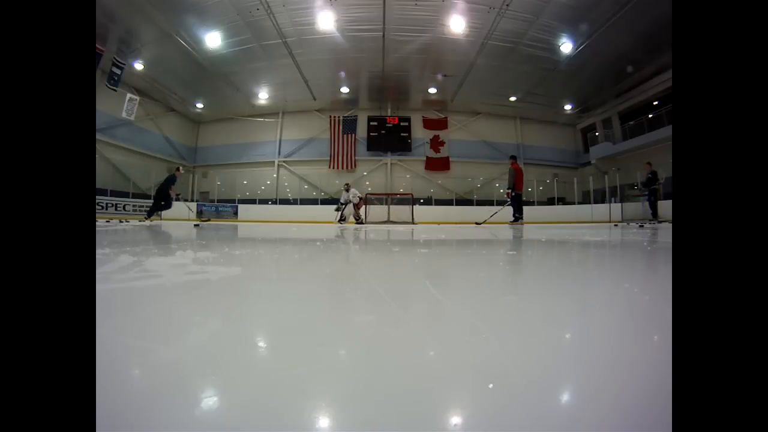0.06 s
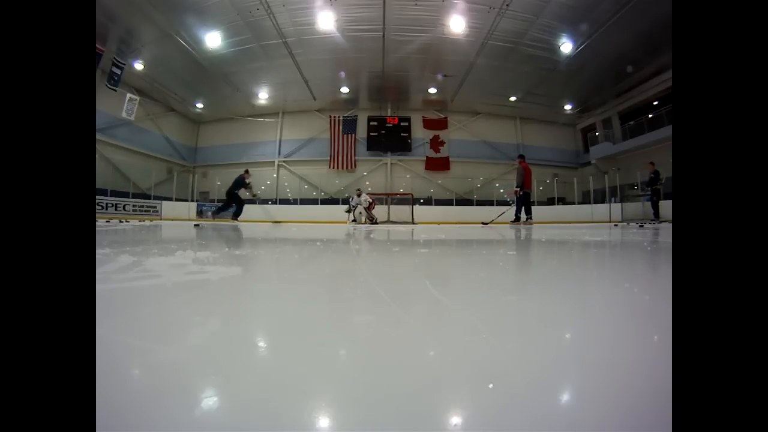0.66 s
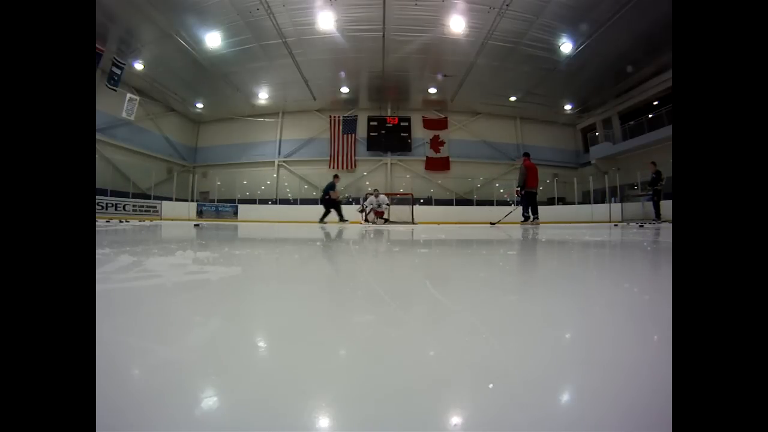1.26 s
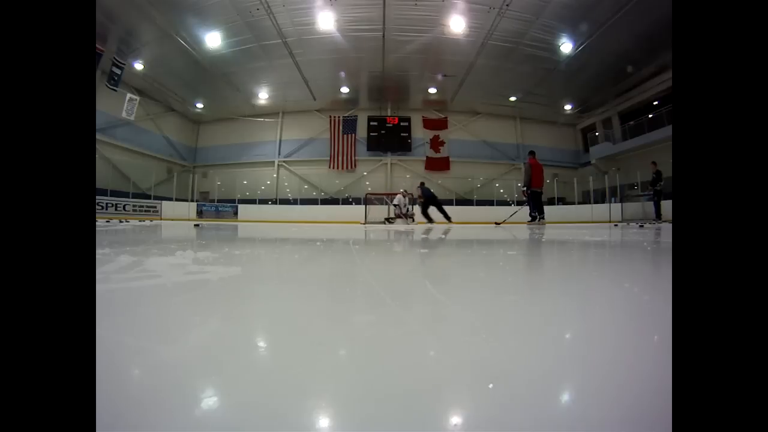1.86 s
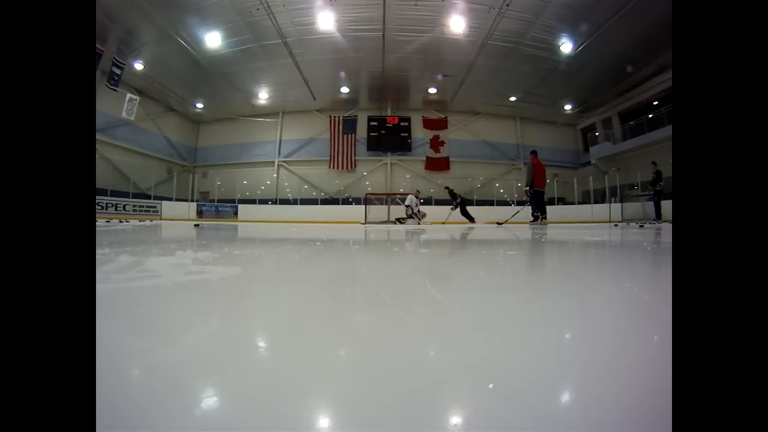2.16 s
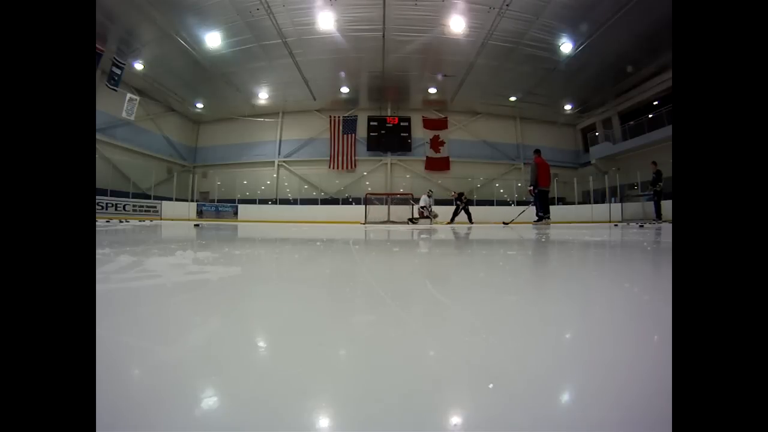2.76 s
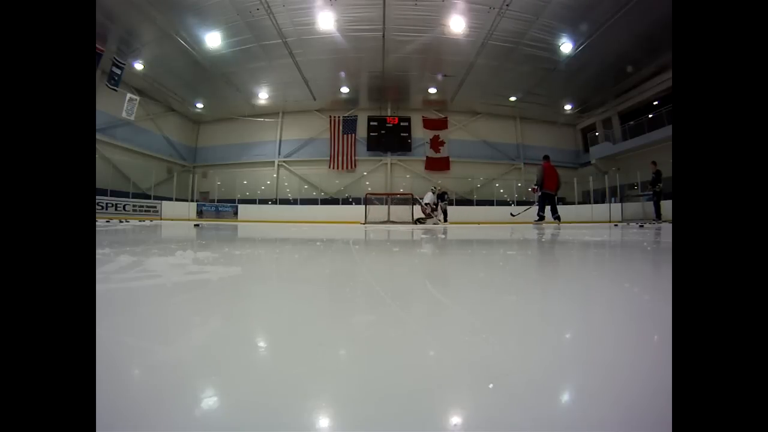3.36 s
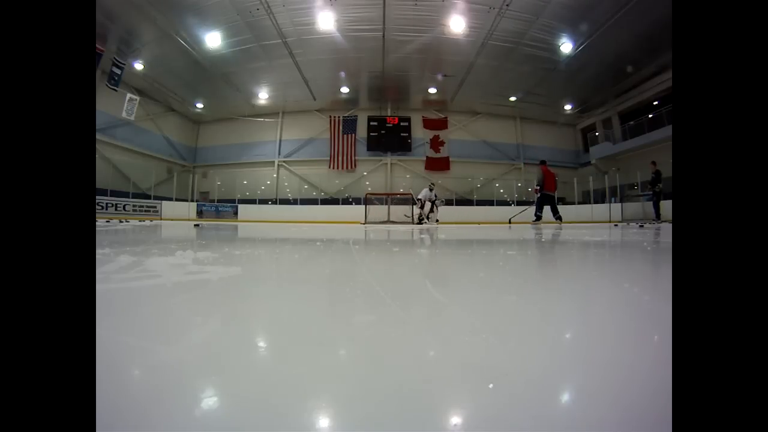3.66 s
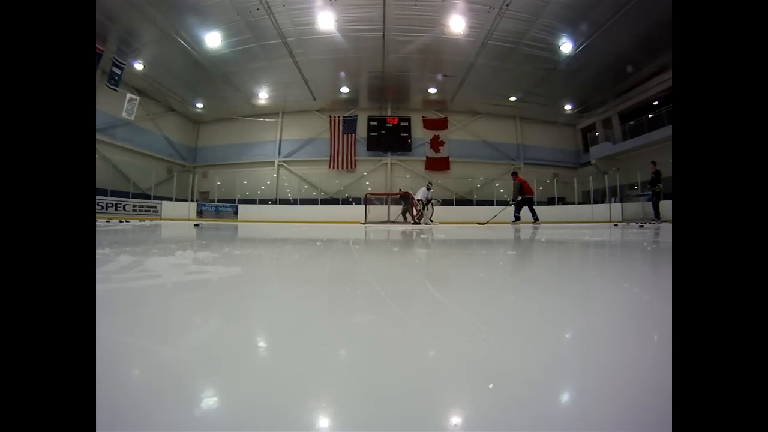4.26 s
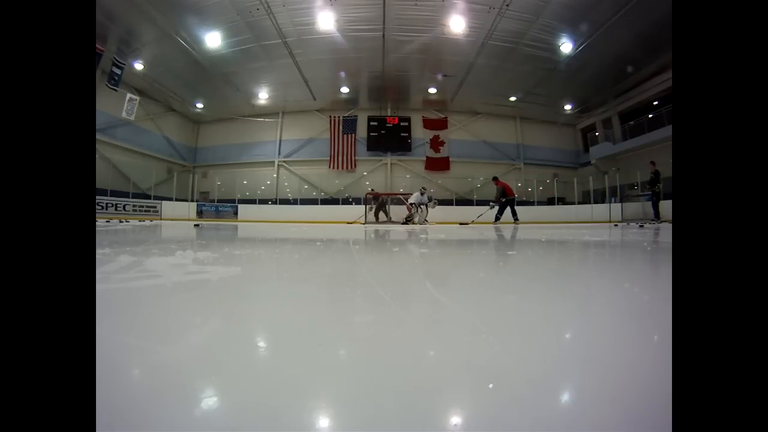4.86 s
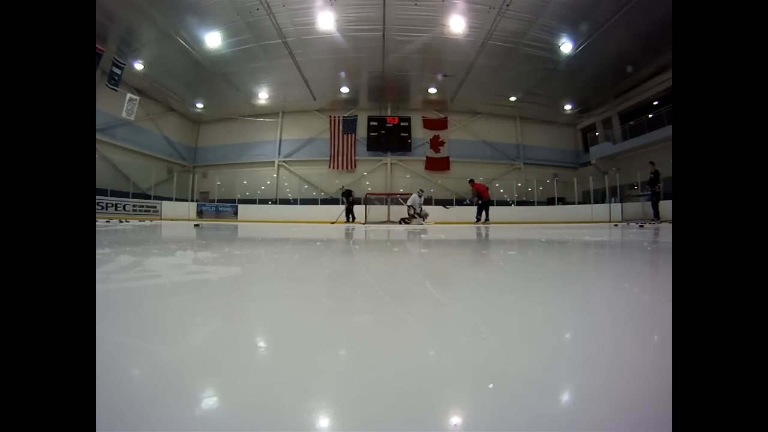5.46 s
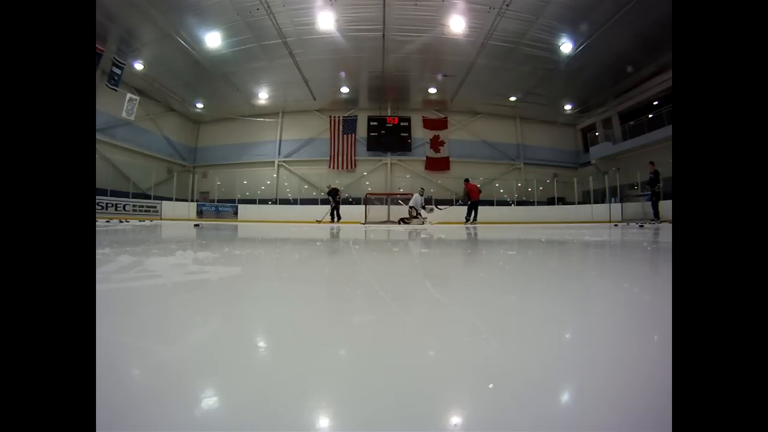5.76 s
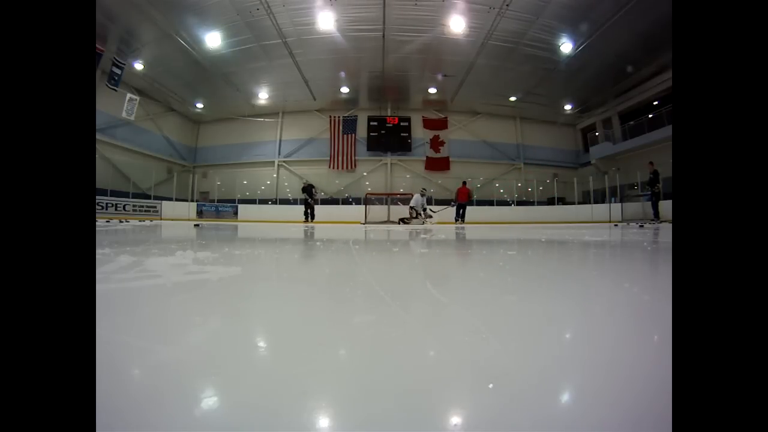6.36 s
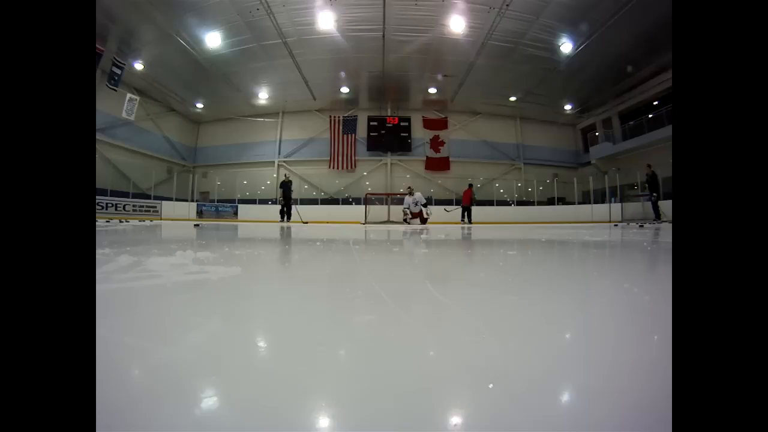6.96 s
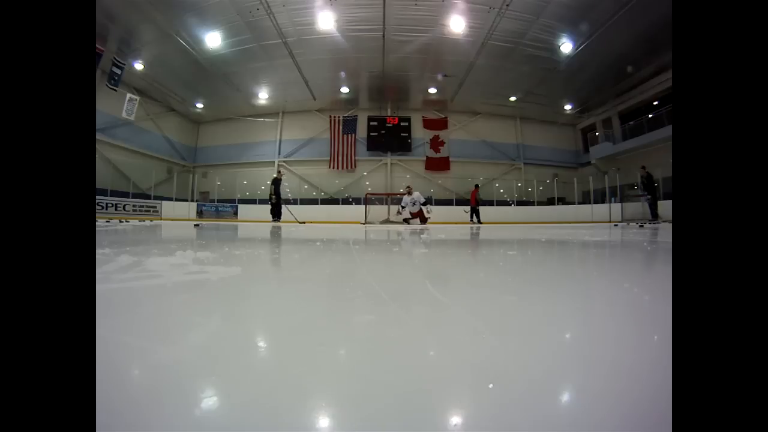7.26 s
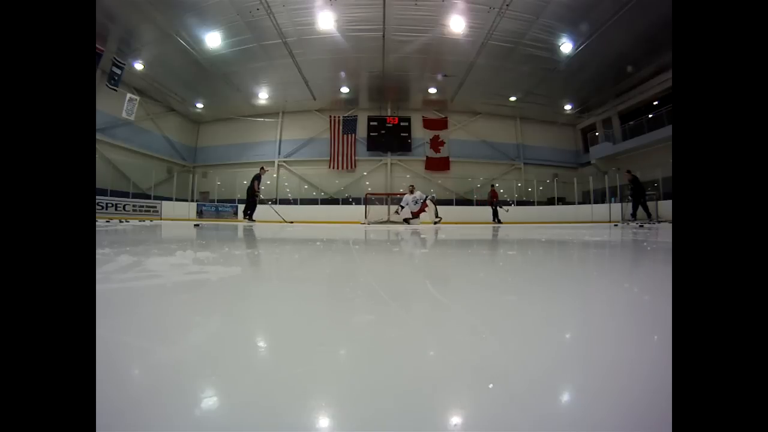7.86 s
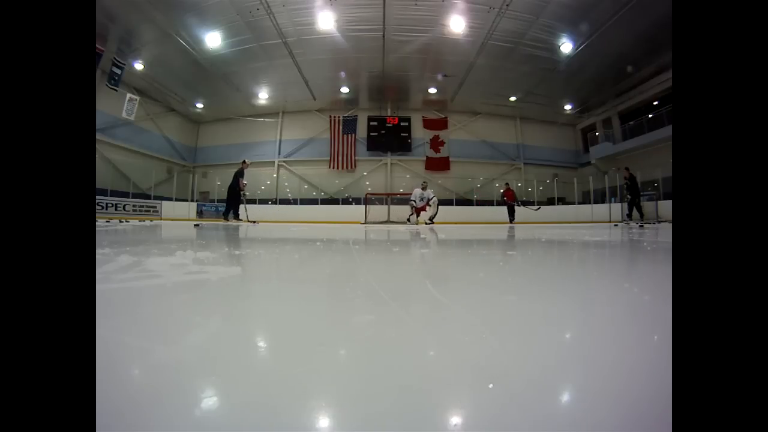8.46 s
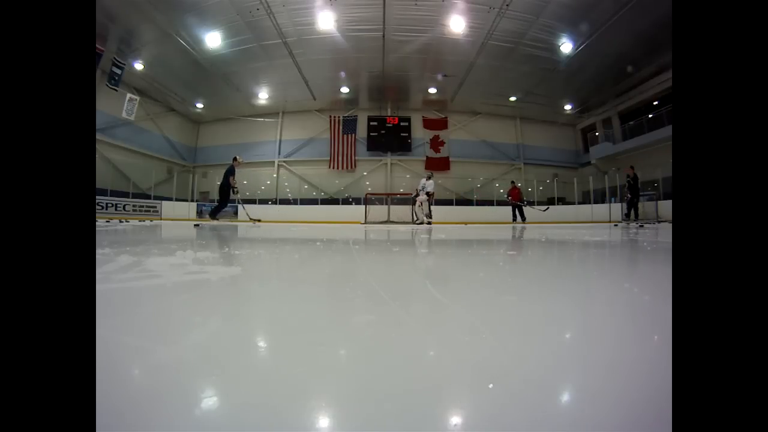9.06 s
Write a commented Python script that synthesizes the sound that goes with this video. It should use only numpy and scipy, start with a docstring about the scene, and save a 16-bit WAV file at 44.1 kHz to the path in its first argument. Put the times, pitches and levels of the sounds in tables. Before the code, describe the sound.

Skates crunch and scrape across ice while hockey sticks tap a puck. A wrist shot cracks early, followed by dull goalie pad thumps and carving blades. After more sharp knocks, a loud slap shot bangs off the far boards and rings through the indoor rink, then skating picks up again. The microphone lies on the ice, sounding boxy and slightly fizzy, with ventilation running steadily behind.

```python
"""Shooting practice, indoor ice rink

The microphone lies on the ice in a small camera case, with the ventilation running behind.
Skates crunch and carve, sticks tap the puck, pads thump through the ice, a wrist shot and a slap shot
crack. The far walls answer and the steel-roofed hall rings for seconds.
The case colours it all and a coarse converter adds a glassy fizz."""
import sys
import numpy as np
from scipy import signal
from scipy.fft import rfft, irfft, next_fast_len
from scipy.io import wavfile

SR = 44100
rng = np.random.default_rng(int(sys.argv[2]) if len(sys.argv) > 2 else 0)


def generate_wav(signal):
    """Clip the signal to [-1, 1] and save it as 16-bit WAV at the path in sys.argv[1]."""
    frames = np.transpose(np.atleast_2d(signal))
    scaled = np.clip(frames, -1, 1) * 32767
    pcm = np.round(scaled).astype(np.int16)
    wavfile.write(sys.argv[1], SR, pcm)


N = 405712
NFFT = 2 * next_fast_len(N // 2 + 1)
TIME = np.arange(N) / SR
FREQ = np.arange(NFFT // 2 + 1) * SR / NFFT + 1

# Levels are relative within each table.
# room tone, the spectrum of the ventilation: f/Hz, level/dB
AIR_SPECTRUM = [(25, -1.5), (60, 1.5), (100, 4), (170, 0.5), (450, -0.5), (800, -0.5), (1200, 1),
                (2300, -26), (5500, -15)]
# hum of fans and lamp ballasts: f/Hz, level/dB
HUM_TONES = [(98, -58), (120, -76)]
# reverberation of the hall: f/Hz, t60/s
HALL_DECAY = [(125, 9.4), (500, 4.5), (1200, 6.5), (2300, 4.71), (3500, 3.5), (5500, 2.6)]
# slaps of a shot off the far walls: delay/s, level/dB
WALL_ECHOES = [(.079, -30), (.25, -14), (0.294, -13), (.437, -13), (.683, -17)]
# modes of the ice sheet under the microphone: f/Hz, width/Hz, level/dB
ICE_MODES = [(123.3, 38, 2), (263, 79, -2.5), (175, 190, -11.5)]
# pads and boots landing, carried by the ice: t/s, level/dB, f/Hz
LANDINGS = [(.23, -49.5, 130), (.98, -44, 136), (1.029, -44, 234), (1.661, -52, 129), (1.879, -45.5, 249.5),
            (2.204, -50, 129), (3.881, -51, 130), (4.092, -53, 255), (4.723, -54, 127), (5.39, -52, 135),
            (6.159, -52, 128), (7.638, -49.5, 139), (8.119, -55, 130), (9.153, -49.5, 247)]
# icy hiss and rumble, from gliding blades and the wash after the slap shot: t/s, level/dB
HISS_LEVEL = [(0, -40.5), (.5, -44), (1.1, -40), (2.0, -32.5), (2.8, -36), (3.3, -42), (4.5, -46.5),
              (6.0, -48.5), (7.0, -41), (8.4, -55), (9.2, -53)]
# skate strokes: t/s, length/s, level/dB, snow spray over scrape/dB
SKATE_STROKES = [(-.05, 0.11, -38.5, -25), (0.245, 0.09, -39, -20), (0.559, .06, -42, -10),
                 (0.743, 0.087, -39.5, 0.5), (0.928, 0.093, -31, -27), (1.235, .19, -32, -11),
                 (1.575, .05, -35, 2), (2.098, 0.36, -35, -2), (2.462, .19, -32.5, -6),
                 (4.08, 0.086, -39, -27), (4.679, .15, -43.5, -2), (5.39, 0.15, -40, -21),
                 (7.627, 0.156, -38.5, 0), (7.906, 0.15, -39, -5), (8.075, 0.4, -42.5, -6.5),
                 (8.458, 0.45, -43.5, -4), (8.864, 0.2, -45, 0.5), (9.04, 0.21, -41, 4),
                 (9.127, .2, -41, -13)]
# a blade edge singing as it carves: t/s, length/s, level/dB, f/Hz
EDGE_CARVES = [(2.226, 0.1, -33.5, 2175), (2.47, 0.17, -33.5, 3310), (4.124, 0.17, -38.5, 2140),
               (7.663, .13, -48, 3520), (8.445, .13, -42, 3550), (8.693, 0.083, -41.5, 2175),
               (8.81, 0.27, -37, 1794), (9.143, 0.14, -35, 1820)]
# modes of a stick's shaft and blade: f/Hz, level/dB, t60/s
STICK_MODES = [(1083, 3, 0.057), (1387, 1.5, 0.08), (1830, -21, 0.012), (2190, -2, 0.01), (2640, 12, 0.028),
               (3140, 20, 0.0058)]
# stick and puck knocks, skate clacks, ice-chip ticks and quick echoes: t/s, level/dB, f/Hz, Q
SHARP_KNOCKS = [(.3115, -22.5, 1890, 1.8), (.334, -24.5, 2280, 1.3), (.513, -30, 2240, 1.6),
                (.572, -35, 5000, 1.2), (.619, -15, 1850, 4.2), (.672, -15, 1910, 5.5),
                (.728, -24.5, 2600, 0.49), (.772, -23, 3320, 1.8), (.8934, -24, 2330, 1.9),
                (1.0, -18, 1750, 0.95), (1.2448, -17, 1650, 0.52), (1.3357, -19, 2150, 1.1),
                (1.57, -18, 5140, 1.25), (1.774, -23, 2490, 2.1), (1.88, -18.5, 3450, 3.5),
                (1.888, -15.5, 1800, 0.38), (1.939, -25, 2300, 3.9), (3.8134, -13, 3080, 2.2),
                (3.825, -22, 3300, 0.75), (3.839, -16.5, 5000, 2.2), (3.863, -24.5, 2400, 0.94),
                (3.882, -21, 3040, 0.82), (4.089, -28, 2600, .5), (4.111, -25, 1200, 1.3),
                (4.729, -29, 2020, .4), (5.558, -33, 1227, 1.4)]
# a stick blade clattering on the ice in four evenly spaced knocks: t/s, gap/s, level/dB, f/Hz
CLATTERS = [(.222, 0.02, -21.5, 1720), (6.051, .0207, -22, 1940), (7.968, .018, -24.5, 2110)]
# the four knocks of a clatter, the third loudest: level/dB
CLATTER_ACCENTS = [-2.5, -6, 0.5, -9.5]
# two shots, blade on ice and puck, puck on far boards: t/s, level/dB, f/Hz, Q, contact/s, hall send/dB
SHOT_BLOWS = [(.970, -21.5, 1220, 0.44, 0.005, 2), (1.020, -18, 2630, 0.69, 0.0036, 1.5),
              (1.027, -21.5, 2260, 0.8, 0.0048, -5), (6.1555, -19.5, 1220, 0.31, 0.0037, 3),
              (6.169, -21, 2700, 0.84, 0.0045, -1.5), (6.178, -12.5, 3160, 0.66, 0.0039, 6.5),
              (6.215, -12.5, 2655, 3.9, 0.00097, 10.5)]
# resonances of the case around the microphone: f/Hz, width/Hz, level/dB
CASE_MODES = [(528, 435, -12.5), (1022, 224, -4.5), (1212.4, 135, 1), (1645, 860, -4.5), (2271, 366, -.5),
              (2650, 443, -7), (3090, 530, -13), (3616, 446, -6.5), (5620, 3500, -18)]


def undb(db):
    """Decibels to gain."""
    return 10 ** (np.asarray(db) / 20)


def unit(x):
    """Scale to an rms of one."""
    return x / np.sqrt(np.mean(x ** 2))


def curve(rows):
    """Gain over time from rows of t/s, level/dB."""
    return undb(np.interp(TIME, *np.transpose(rows)))


def add(track, s, x):
    """Mix x into the track from time s on."""
    i = int(s * SR)
    x, i = x[max(-i, 0):], max(i, 0)
    track[i:i + len(x)] += x[:max(N - i, 0)]


def band(x, hz, q):
    """One resonance, gain 1 at its centre."""
    return signal.lfilter(*signal.iirpeak(hz, max(q, hz / 9000), fs=SR), x)


def steep_band(x, hz, q):
    """The same resonance twice over, scaled to an rms of one."""
    return unit(band(band(x, hz, q), hz, q))


def wander(n, rate_hz):
    """Smooth random drift with a spread near one."""
    steps = np.arange(n) * rate_hz / SR
    return np.interp(steps, np.arange(4096), rng.standard_normal(4096))


def resonances(modes):
    """Gain over frequency of steep overlapping resonances."""
    powers = (undb(db) ** 2 / (1 + (2 * (FREQ - hz) / width) ** 2) ** 2 for hz, width, db in modes)
    return np.sqrt(sum(powers))


def noise(gain):
    """Noise of rms one with the given gain over frequency."""
    return unit(irfft(rfft(rng.standard_normal(NFFT)) * gain, NFFT)[:N])


def ventilation(air_db=-45.5):
    """Room tone: steady air handling, with a wavering hum of fans and lamp ballasts."""
    centres, levels = np.transpose(AIR_SPECTRUM)
    air = noise(undb(np.interp(np.log(FREQ), np.log(centres), levels)))
    hum = sum(undb(db) * np.sin(2 * np.pi * hz * TIME + 0.87 * wander(N, 3)) for hz, db in HUM_TONES)
    return undb(air_db) * air + hum


def hall(x, build_s=0.0044, slap_db=3.5, blend_s=0.12, early_db=2.5, early_s=0.34):
    """Separate slaps off boards, glass and roof blend into a long tail whose treble dies first."""
    t = TIME[:4 * SR]
    echoes = rng.standard_normal(len(t)) * undb(slap_db * np.exp(-t / blend_s) * wander(len(t), 330))
    spectrum = rfft(echoes)
    hz = np.arange(len(spectrum)) * SR / len(t) + 1
    centres, t60s = np.transpose(HALL_DECAY)
    tail = 0
    for share, t60 in zip(np.eye(len(centres)), t60s):
        weight = np.interp(np.log(hz), np.log(centres), share)
        tail += irfft(spectrum * weight, len(t)) * np.exp(-np.log(1000) * t / t60)
    tail *= 1 - np.exp(-t / build_s)
    tail *= undb(early_db * np.exp(-t / early_s))  # the first reflections are the strongest
    return signal.fftconvolve(x, tail / np.sqrt(np.sum(tail ** 2)))[:N]


def far_walls(x):
    """A few distinct, duller repeats from the distant ends of the rink."""
    out = np.zeros(N)
    dull = band(x, hz=2200, q=0.44)
    for delay, db in WALL_ECHOES:
        add(out, delay, undb(db) * dull)
    return out


def board_boom(x):
    """A hard blow also shakes the ice and boards, which feed the hall with low notes."""
    return x + undb(-1) * band(x, hz=500, q=3.3) + undb(3) * band(x, hz=105, q=1.8)


def ice_sheet(rise_s=0.017):
    """A rumble that follows the hiss, and thumps of pads and boots, reach the case through the ice."""
    out = noise(resonances(ICE_MODES)) * undb(-34.5) * curve(HISS_LEVEL) ** 0.63
    t = np.arange(SR // 4) / SR
    for s, db, hz in LANDINGS:
        boom = np.sin(2 * np.pi * hz * t + wander(len(t), 121))
        padding = steep_band(rng.standard_normal(len(t)), hz, q=0.8)
        envelope = t / rise_s * np.exp(1 - t / rise_s)
        add(out, s, undb(db) * envelope * (boom + undb(-5) * padding))
    return out


def ice_chips(per_s, spread_db, chatter_db, chatter_hz):
    """Ice breaking under steel: dense tiny fractures, bunched by the chatter of the blade."""
    size = undb(spread_db * np.minimum(rng.exponential(size=N), 5))
    fractures = (rng.random(N) < per_s / SR) * rng.choice([-1, 1], N) * size
    return unit(fractures * undb(chatter_db * wander(N, chatter_hz)))


def skates(stroke_db=4, hiss_db=3, carve_db=1):
    """Pushes and stops crunch and spray snow, edges sing, and an icy hiss swells and fades beneath."""
    crunch = ice_chips(per_s=5000, spread_db=2.5, chatter_db=1.5, chatter_hz=91.2)
    snow = ice_chips(per_s=9000, spread_db=2, chatter_db=2.5, chatter_hz=70)
    hiss = ice_chips(per_s=6000, spread_db=2, chatter_db=4, chatter_hz=45.81)
    spray = unit(band(band(snow, hz=4500, q=0.43), hz=4100, q=0.57))
    out = unit(band(hiss, hz=1570, q=0.98)) * curve(HISS_LEVEL) * undb(hiss_db)
    for s, length, db, spray_db in SKATE_STROKES:
        span = (int(s * SR) + np.arange(int(length * SR))) % N
        pressure = signal.windows.tukey(len(span), 0.29)
        scrape = unit(band(crunch[span], hz=1850, q=1))
        add(out, s, undb(db + stroke_db) * pressure * (scrape + undb(spray_db) * spray[span]))
    for s, length, db, hz in EDGE_CARVES:
        span = (int(s * SR) + np.arange(int(length * SR))) % N
        pressure = signal.windows.tukey(len(span), 0.98)
        add(out, s, undb(db + carve_db) * pressure * steep_band(crunch[span], hz, q=5.9))
    return out


def knock(hz, q, contact_s, overtone_db, crack_db, ring_db):
    """A brief contact: a dry crack, a hollow knock with its overtone, a short ring of the shaft."""
    t = np.arange(SR // 12) / SR
    # the contact excites all frequencies evenly, each at a slightly different instant
    phase = np.angle(rfft(rng.standard_normal(len(t)) * np.exp(-t / contact_s)))
    push = irfft(np.exp(1j * phase), len(t)) * np.exp(-t / (10 * contact_s))
    ring = 0
    for mode_hz, db, t60 in STICK_MODES:
        detuned_hz = mode_hz * (1 + 0.03 * rng.standard_normal())
        ring += undb(db) * np.sin(2 * np.pi * detuned_hz * t) * np.exp(-np.log(1000) * t / t60)
    hollow = steep_band(push, hz, q) + undb(overtone_db) * steep_band(push, 2 * hz, q)
    crack = unit(band(push, hz=3450, q=0.21))
    hit = hollow + undb(crack_db) * crack + undb(ring_db) * unit(ring)
    return unit(hit) * np.sqrt(contact_s / t[-1])


def blows(rows, gain_db, **timbre):
    """Knocks on two paths: straight to the microphone, and out into the hall."""
    direct, sent = np.zeros(N), np.zeros(N)
    for s, db, hz, q, contact_s, send_db in rows:
        hit = undb(db + gain_db) * knock(hz, q, contact_s, **timbre)
        add(direct, s, hit)
        add(sent, s, hit * undb(send_db))
    return direct, sent


def taps_and_clatters(contact_s=0.0034, send_db=-2.5, clatter_send_db=1.5, clatter_q=1.27, click_q=0.54):
    """Sharp knocks and stick clatters, among faint random clicks that follow the level of the hiss."""
    rows = [(s, db, hz, q, contact_s, send_db) for s, db, hz, q in SHARP_KNOCKS]
    for start, gap, db, hz in CLATTERS:
        for k, accent_db in enumerate(CLATTER_ACCENTS):
            rows.append((start + k * gap, db + accent_db, hz, clatter_q, contact_s, clatter_send_db))
    for when, strength, colour in rng.random((int(5 * N / SR), 3)):  # five clicks a second
        s = when * N / SR
        db = np.interp(s, *np.transpose(HISS_LEVEL)) + 6 + strength
        hz = 2400 * 2 ** (colour - 0.5)
        rows.append((s, db, hz, click_q, contact_s, send_db))
    return blows(rows, gain_db=-1, overtone_db=-5.5, crack_db=-27, ring_db=-8.5)


def puck_shots():
    """Wrist shot and slap shot: the blade cracks on ice and puck; the slap shot bangs the far boards."""
    return blows(SHOT_BLOWS, gain_db=7.5, overtone_db=-40, crack_db=-3.5, ring_db=-11.5)


def scene():
    """The rink from ice level: the players, the hall around them and its machinery."""
    taps, taps_sent = taps_and_clatters()
    shots, shots_sent = puck_shots()
    blades = skates()
    direct = taps + shots + undb(-2) * blades
    # each place on the ice has its own paths to the walls
    reverb = hall(undb(-3) * taps_sent) + hall(undb(-4) * blades)
    reverb += hall(undb(-1.5) * board_boom(shots_sent))
    return (direct + reverb + far_walls(shots) + undb(13) * ice_sheet() + ventilation())[None]


def record(dry, leak_db=-11, leak_hz=330, converter_hz=12000, top_hz=15400):
    """The case rings and muffles the microphone; a coarse converter mirrors the mids into the treble."""
    bass_leak = undb(leak_db) / (1 + (FREQ / leak_hz) ** 2)
    case_gain = np.hypot(resonances(CASE_MODES), bass_leak)
    # minimum phase: the case rings only after a sound strikes it
    cepstrum = irfft(np.log(case_gain), NFFT)
    causal = np.r_[1, np.full(NFFT // 2 - 1, 2), np.zeros(NFFT // 2)]
    case_ring = irfft(np.exp(rfft(cepstrum * causal)), NFFT)[:4096]
    cased = signal.fftconvolve(dry[0], case_ring)[:N]
    smooth = signal.sosfilt(signal.butter(10, 5550, fs=SR, output="sos"), cased)
    # holding each sample makes the steps that fizz
    held = np.repeat(signal.resample_poly(smooth, converter_hz, SR), 4)
    fizzy = signal.resample_poly(held, SR, 4 * converter_hz)[:N]
    return signal.sosfilt(signal.ellip(8, 0.2, 70, top_hz, fs=SR, output="sos"), fizzy)[None]


dry = scene()
out = record(dry)
generate_wav(out)
```